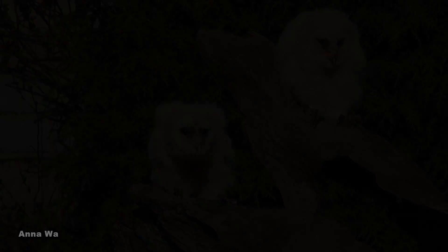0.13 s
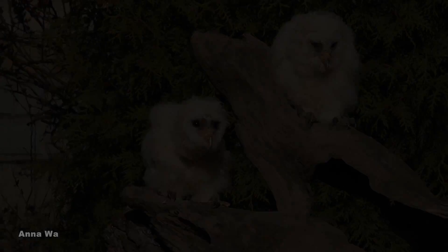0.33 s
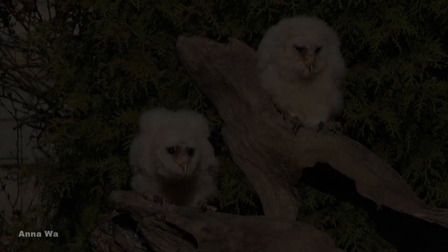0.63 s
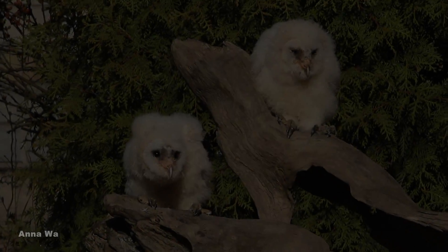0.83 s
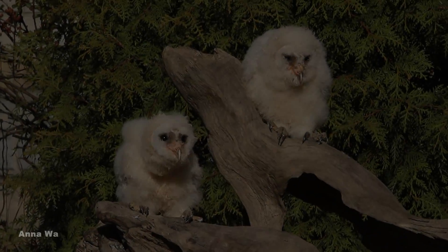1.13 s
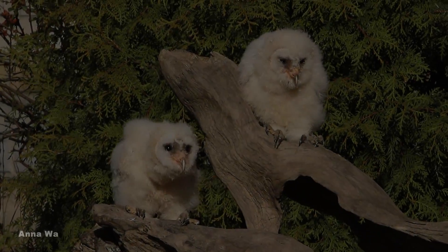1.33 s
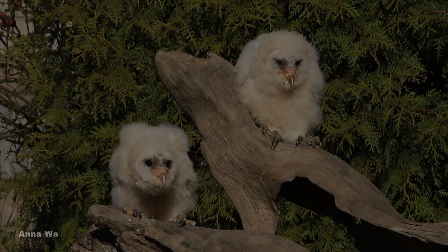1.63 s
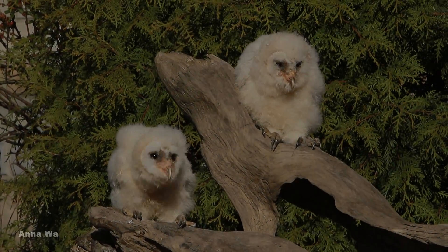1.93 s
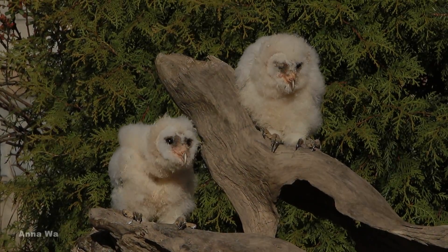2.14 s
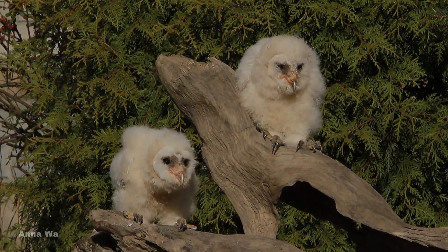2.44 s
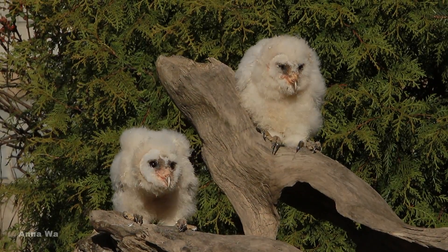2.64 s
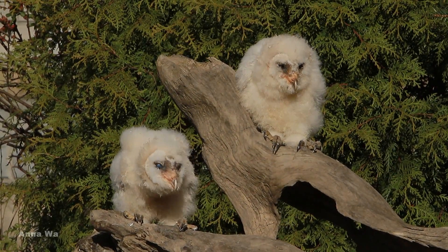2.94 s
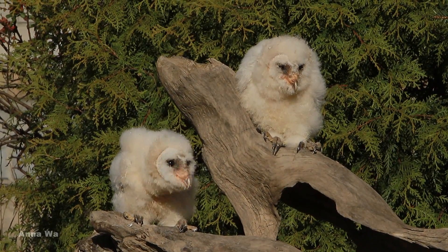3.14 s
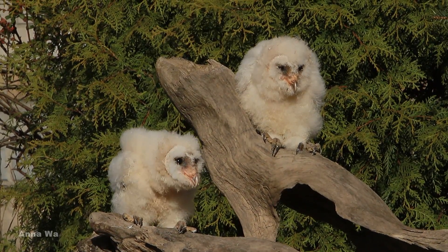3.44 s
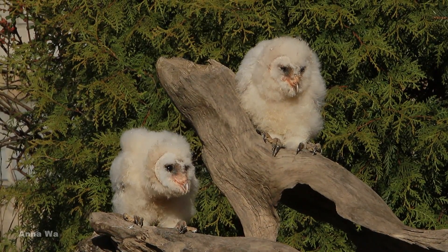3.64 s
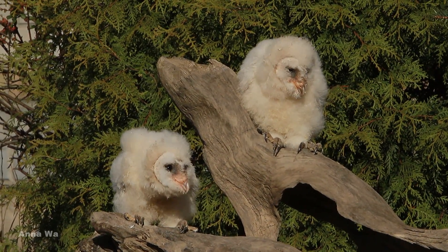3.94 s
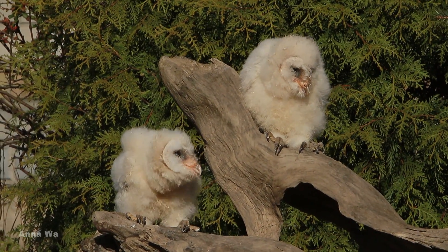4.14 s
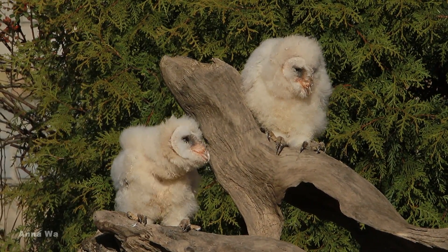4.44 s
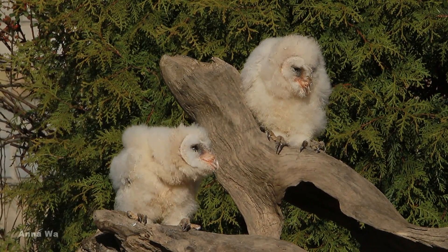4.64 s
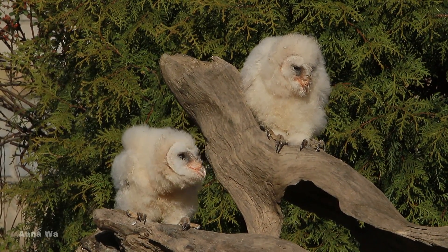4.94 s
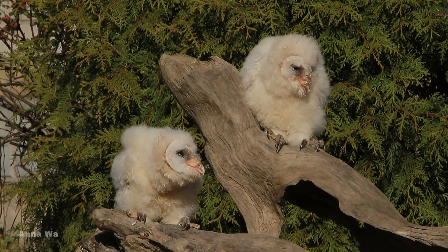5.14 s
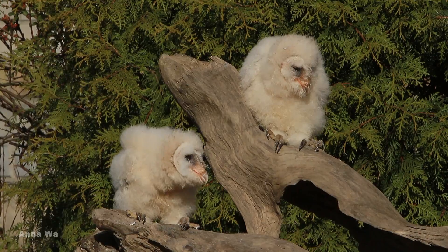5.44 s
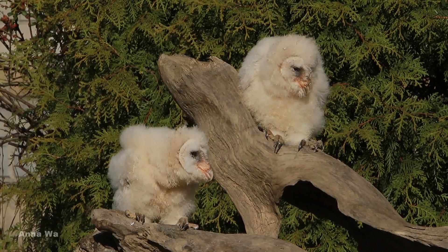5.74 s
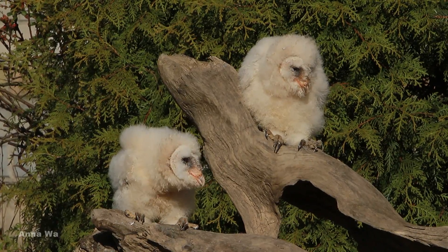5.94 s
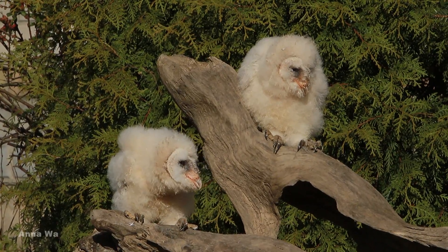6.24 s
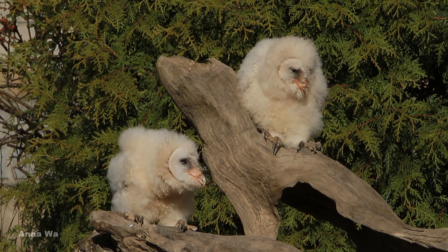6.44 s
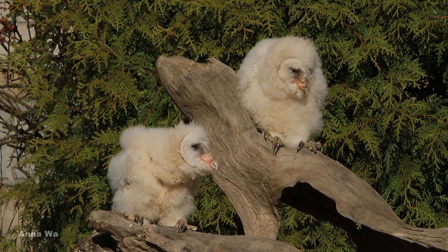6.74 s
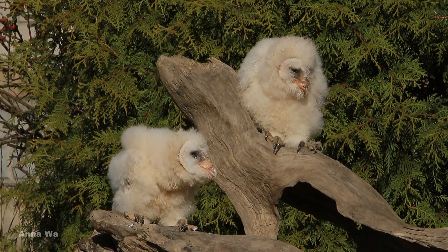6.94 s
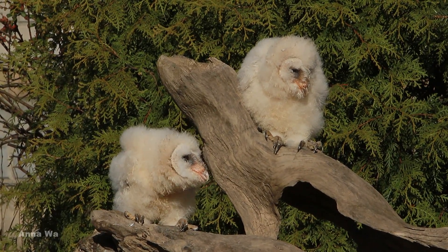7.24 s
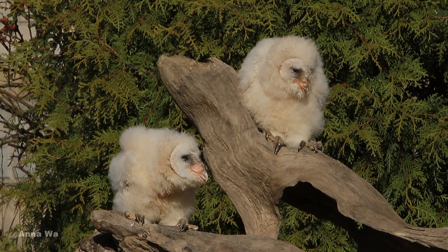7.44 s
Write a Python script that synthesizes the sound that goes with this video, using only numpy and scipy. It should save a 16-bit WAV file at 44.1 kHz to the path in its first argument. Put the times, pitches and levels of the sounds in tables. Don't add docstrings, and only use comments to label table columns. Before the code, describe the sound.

A downy owl chick on a log calls four times in a garden. Each screech is a raspy, shrill trill of rapid arched whistles with creaking between them. The first is already under way and fairly quiet, the second a little stronger, the third and fourth loud and piercing. Tiny squeaks mark starts and ends, a breathy hiss opens the third, and claws tap wood early on. Close mono microphone, slight outdoor echo, low far traffic.

```python
import sys
import numpy as np
from scipy import signal
from scipy.fft import rfft, irfft, next_fast_len
from scipy.io import wavfile
from scipy.ndimage import uniform_filter1d

SR = 44100
rng = np.random.default_rng(int(sys.argv[2]) if len(sys.argv) > 2 else 0)


def wrap_up_sound(samples):
    columns = np.atleast_2d(samples).T
    tamed = np.clip(columns, -1, 1)
    steps = np.round(tamed * 32767).astype(np.int16)
    wavfile.write(sys.argv[1], SR, steps)


def gain_from_decibels(decibels):
    exponent = np.asarray(decibels, float) / 20
    return 10 ** exponent


N = 334719
T = np.arange(N) / SR
HZ = np.arange(next_fast_len(N) // 2 + 1) * SR / next_fast_len(N)


def rms_one(x):
    return x / np.sqrt(np.mean(x ** 2) + 1e-20)


def through(x, response):
    size = next_fast_len(N)
    return irfft(rfft(x, size) * response, size)[:N]


def coloured(points):
    hz, level_db = np.transpose(points)
    curve_db = np.interp(np.log(HZ + 1), np.log(hz), level_db)
    return rms_one(through(rng.standard_normal(N), gain_from_decibels(curve_db)))


def drift(rate_hz):
    return rms_one(through(rng.standard_normal(N), 1 / (1 + (HZ / rate_hz) ** 2)))


# (time [s], level [dB])
GARDEN_LEVEL = [(0.0, -62.5), (1.2, -68.5), (3.32, -66.5), (4.25, -60.5), (4.97, -62.5), (5.81, -61.5),
                (6.42, -64.5), (7.59, -57.5)]
# (frequency [Hz], level [dB per Hz])
GARDEN_SPECTRUM = [(15, -57.5), (25, -7), (91, -3), (240, -3), (317, -1), (500, -7), (1400, -12),
                   (2160, -14.5), (15900, -36)]


def garden():
    s, db = np.transpose(GARDEN_LEVEL)
    gusts_db = 0.7 * drift(3)
    return gain_from_decibels(np.interp(T, s, db) + 2.0 + gusts_db) * coloured(GARDEN_SPECTRUM)


def resonance(hz, centre_hz, width_hz):
    return 1j * hz * width_hz / (centre_hz ** 2 - hz ** 2 + 1j * hz * width_hz)


# (frequency [Hz], width [Hz], level [dB])
POSTURES = [
    [(2525, 570, -5), (5500, 2350, -1.5), (7240, 970, 3.5), (8710, 590, 2.5), (10650, 1400, 1),
     (15700, 2300, -31)],
    [(2600, 1600, -2.5), (4640, 710, 9.5), (7030, 590, 9.5), (8800, 1100, 5), (11700, 820, 5),
     (15100, 2500, -45)],
    [(2600, 1600, 0), (4700, 2800, 1.5), (5880, 1820, 7), (7070, 3800, 1.5), (11170, 1500, -1.5),
     (15100, 2300, -27)],
    [(3150, 1100, -8.5), (5270, 680, -1), (7240, 630, -1), (8300, 500, -9), (9700, 1100, -1.5),
     (15400, 2500, -13)],
    [(3000, 4000, -10), (4700, 1500, -2), (7400, 970, -5.5), (8200, 370, 1), (9600, 2600, -5.5),
     (15500, 1700, -23)],
    [(2880, 2350, -5), (4700, 1300, -0.5), (6700, 1570, 1), (9160, 970, 1.5), (10980, 910, -0.5),
     (15000, 2500, -49)],
    [(2560, 2700, -1.5), (4800, 1740, 4.5), (6870, 1560, 4), (8740, 1100, 6), (10840, 1870, 0.5),
     (15000, 2800, -13)],
]
POSTURE_CHANGES = [2.3, 2.82, 3.8, 4.04, 4.27, 6.0]
WINDPIPE_CUT_HZ = 1550


def throat(hz, posture):
    peaks = 0
    for k, (centre_hz, width_hz, db) in enumerate(POSTURES[posture]):
        peaks = peaks + (-1) ** k * gain_from_decibels(db) * resonance(hz, centre_hz, width_hz)
    return peaks / (1 + (WINDPIPE_CUT_HZ / (hz + 1)) ** 6)


# (time [s], air flow [dB], slackness as buzz over flow [dB])
BREATH_FLOWS = [
    [(0.0, -54, -16.5), (0.462, -56, -15.5), (0.62, -55.5, -15), (0.75, -68, -35)],
    [(0.765, -56.5, -16), (0.865, -59.5, -10), (0.955, -60, -27)],
    [(0.968, -60, -18), (1.394, -57.5, -23), (1.766, -51, -25), (1.818, -52, -46), (1.93, -52, -19),
     (1.945, -55, -10)],
    [(2.525, -58, 1), (2.55, -80, 13)],
    [(2.596, -60, -26), (2.607, -57, -21.5)],
    [(2.636, -66, -14), (2.642, -58, -10)],
    [(2.645, -47, -17), (2.668, -55, -25)],
    [(2.671, -47, -12), (2.835, -55, -4.5), (3.103, -48, -14.5), (3.391, -53, -9), (3.46, -46.5, -13.5),
     (3.51, -43.5, 3), (3.53, -46, 6), (3.552, -56.5, -30), (3.72, -73, -30)],
    [(3.87, -58.5, -26), (4.064, -37, -47), (4.194, -44.5, -8.5), (4.592, -38.5, -21),
     (5.444, -38.5, -19.5), (5.585, -39, -18), (5.6, -41, -14), (5.62, -32.5, -23), (5.655, -39, -15.5),
     (5.672, -43, -5.5)],
    [(6.168, -47, -3.5), (6.352, -38.5, -16), (6.574, -38.5, -16), (6.88, -39.5, -13), (7.12, -41.5, -15),
     (7.268, -59, -29), (7.425, -44, -24), (7.445, -46, -30)],
]


def breath_controls():
    rasp, buzz = np.zeros(N), np.zeros(N)
    for rows in BREATH_FLOWS:
        s, flow_db, slack_db = np.transpose(rows)
        on = (T >= s[0]) & (T < s[-1])
        rasp[on] = gain_from_decibels(np.interp(T[on], s, flow_db))
        buzz[on] = gain_from_decibels(np.interp(T[on], s, flow_db + slack_db))
    return uniform_filter1d(rasp, size=44), uniform_filter1d(buzz, size=44)


# (time [s], share of their final pitch [0-1])
BEAK_OPENING = [(2.64, 0.86), (2.79, 1.0)]


def gaping(x):
    share = np.interp(T, *np.transpose(BEAK_OPENING))
    lag = np.cumsum(1 - share)
    slowed = np.interp(np.arange(N) - lag, np.arange(N), x)
    return np.where((share < 1) & (T > 2.3), slowed, x)


SURGE_DB = 10.5
REBOUND_DB, REBOUND_MS = 3, 4


def creak(rasp, buzz, voiced, hoarse, pulse_hz=950, jitter=0.17, size_db=2.8):
    cycles = np.cumsum(pulse_hz * np.exp(jitter * drift(500) + 0.05 * drift(25))) / SR
    slap_sizes = gain_from_decibels(size_db * np.clip(rng.standard_normal(N), -2, 1.5))
    slaps = np.diff(np.floor(cycles), prepend=0) * slap_sizes
    slaps = rms_one(slaps - slaps.mean())
    air = rng.standard_normal(N)
    leak = 0.15 + 1.6 * hoarse ** 2
    source = (1 - hoarse) * slaps * (1 - voiced) + leak * air * (1 - (1 - hoarse ** 2.7) * voiced)
    posture = np.searchsorted(POSTURE_CHANGES, T)
    high = np.zeros(N)
    for k in range(len(POSTURES)):
        response = throat(HZ, k)
        held = uniform_filter1d(1.0 * (posture == k), size=3000)
        high += held * rms_one(through(source, response * abs(response) ** 0.16))
    windpipe = resonance(HZ, 840, 1330) * (resonance(HZ, 740, 940) - 0.5 * resonance(HZ, 1420, 190))
    low = rms_one(through(slaps * (1 - 0.82 * voiced) + 0.53 * air * (1 - voiced), windpipe))
    ending = np.maximum(-np.diff(voiced, prepend=0), 0)
    rebound = signal.lfilter([1], [1, -np.exp(-1000 / (REBOUND_MS * SR))], ending)
    surge_db = SURGE_DB * uniform_filter1d(voiced, size=600) + REBOUND_DB * rebound - 3.5
    clumps = gain_from_decibels(1.4 * drift(60))
    return (gain_from_decibels(surge_db) * rasp * gaping(high) + gain_from_decibels(0.5) * buzz * low) * clumps


FLICKER_DB = 2.0


def whistle(start_s, pitch, shape, slope_db, wobble):
    phase = 2 * np.pi * np.cumsum(pitch * (1 + wobble)) / SR
    order = np.arange(1, 8)[:, None]
    colour = throat(order * pitch, np.searchsorted(POSTURE_CHANGES, start_s))
    parts = colour * abs(colour) ** 0.65 * gain_from_decibels(slope_db * order) * (order * pitch < 15800)
    chance = rng.standard_normal((7, len(pitch) + 300))
    flicker = uniform_filter1d(chance, size=200)[:, 150:-150] * np.sqrt(200)
    parts = parts * gain_from_decibels(FLICKER_DB * np.minimum(order, 3) * flicker / 2)
    scale = np.sqrt(np.sum(abs(parts) ** 2, axis=0) / 2)
    evened = scale ** 0.37 * scale[np.argmax(shape)] ** 0.71
    return shape * np.real(parts * np.exp(1j * order * phase)).sum(axis=0) / evened


# (time [s], rise [ms], fall [ms], slope [dB per overtone])
MEMBRANE_SETTING = [(0.05, 11.5, 10.7, -3.5), (0.5, 10.7, 10.6, -4), (1.2, 10.2, 11.2, -5.5),
                    (1.66, 12.5, 11.7, -1), (2.85, 10.6, 8.7, -0.5), (3.2, 9.8, 14.5, -2.5),
                    (3.38, 16, 12.6, 1), (3.49, 18, 13, -6), (4.35, 11.4, 9.1, 0.5), (4.549, 10.7, 9.2, 1),
                    (4.8, 8.4, 7.1, 0.5), (5.099, 8.6, 10.5, 1), (5.5, 8, 7.6, 1), (6.25, 9.7, 9.3, -4.5),
                    (6.4, 11.6, 10.8, -1), (6.6, 15.5, 11.3, -0.5), (6.848, 11.7, 7.2, 1.5),
                    (7.001, 12.8, 14.5, 0.4)]


def membrane(when):
    times, *columns = np.transpose(MEMBRANE_SETTING)
    return [np.interp(when, times, column) for column in columns]


# (time of the top [s], level [dB], top pitch [Hz], start pitch [Hz], end pitch [Hz])
OPENING_THROBS = [(0.001, -44.5, 2930, 2700, 2350), (0.055, -43, 2960, 2560, 2400),
                  (0.103, -42, 3000, 2610, 2450), (0.154, -46, 2930, 2310, 2280),
                  (0.207, -45.5, 3140, 2290, 2370), (0.259, -47.5, 3000, 2340, 2220),
                  (0.311, -47, 2880, 2530, 2130), (0.36, -51.5, 2620, 2520, 2500),
                  (0.419, -52.5, 2600, 2470, 2470), (0.463, -50, 2860, 2480, 2060),
                  (0.51, -45, 3060, 2695, 2240), (0.567, -47.5, 2680, 2615, 2260),
                  (0.617, -49, 2695, 2300, 2280), (0.814, -52, 2740, 2500, 2330),
                  (0.864, -54, 2770, 2460, 2200), (0.913, -56.5, 2560, 2500, 2400)]
FIRST_CALL_THROBS = [(1.015, -54, 2455, 2380, 2320), (1.066, -53, 2760, 2360, 2360),
                     (1.119, -53.5, 2620, 2350, 2170), (1.17, -48.5, 3030, 2480, 1970),
                     (1.221, -48, 2960, 2540, 2070), (1.275, -48, 2960, 2300, 2060),
                     (1.328, -51.5, 2620, 2240, 2180), (1.379, -51, 2700, 2600, 2180),
                     (1.431, -48.5, 2860, 2600, 2160), (1.479, -46.5, 2910, 2520, 2200),
                     (1.529, -47.5, 2920, 2440, 2200), (1.577, -48, 2850, 2410, 2440),
                     (1.626, -48.5, 2930, 2560, 2740), (1.677, -47.5, 3030, 2430, 2520)]
SECOND_CALL_THROBS = [(2.835, -47.5, 2490, 2260, 2320), (2.877, -45, 2700, 2250, 2440),
                      (2.923, -38.5, 2880, 2290, 2100), (2.974, -41, 2786, 2450, 2230),
                      (3.023, -41, 2780, 2450, 2210), (3.074, -39.5, 2860, 2410, 2310),
                      (3.122, -41, 2820, 2240, 2370), (3.171, -40, 2936, 2465, 2430),
                      (3.22, -40.5, 2810, 2600, 2390), (3.272, -41, 2936, 2530, 2460),
                      (3.324, -39, 2990, 2350, 2110), (3.379, -36.5, 3080, 2370, 2270),
                      (3.491, -41, 2650, 2310, 2310)]
THIRD_CALL_THROBS = [(4.234, -43, 3200, 2510, 3000), (4.283, -32.5, 3510, 2200, 3100),
                     (4.331, -34, 3536, 2220, 3120), (4.378, -34, 3740, 2260, 3150),
                     (4.424, -31, 3610, 2510, 3000), (4.473, -30, 3960, 2330, 3150),
                     (4.519, -29.5, 3290, 2250, 3080), (4.567, -27.5, 3440, 2240, 3100),
                     (4.615, -31, 3330, 2160, 3100), (4.664, -32, 3260, 2170, 2680),
                     (4.712, -31, 3420, 1916, 3020), (4.76, -31.5, 3040, 2070, 2380),
                     (4.809, -32.5, 3260, 2165, 2880), (4.859, -32, 3170, 2220, 2440),
                     (4.907, -33.5, 2706, 1934, 2150), (4.955, -32, 2504, 2210, 2100),
                     (5.005, -35.5, 2560, 1985, 2080), (5.054, -33.5, 2640, 2150, 2030),
                     (5.104, -34, 2600, 2020, 1890), (5.155, -33, 2560, 2090, 2030),
                     (5.208, -31, 2750, 2070, 2250), (5.257, -31.5, 2390, 2155, 2250),
                     (5.306, -32.5, 2333, 2080, 2100), (5.358, -34, 2560, 2270, 1950),
                     (5.406, -33, 2430, 2230, 1870), (5.462, -32.5, 2760, 1710, 2700),
                     (5.512, -30.5, 2474, 2104, 2300), (5.561, -32, 2366, 2210, 2130)]
FOURTH_CALL_THROBS = [(6.362, -33.5, 2770, 2100, 2240), (6.41, -32, 3110, 2110, 2250),
                      (6.459, -30, 2880, 2126, 2250), (6.509, -28.5, 2940, 2250, 2420),
                      (6.555, -33.5, 2690, 2300, 2420), (6.604, -30, 2810, 2390, 2400),
                      (6.652, -29, 2920, 2214, 2130), (6.703, -27.5, 3000, 2195, 2204),
                      (6.753, -30.5, 2740, 2200, 1904), (6.804, -29.5, 2560, 2150, 2200),
                      (6.853, -30.5, 3080, 2225, 1820), (6.903, -28, 2460, 2170, 2340),
                      (6.952, -31.5, 2580, 2310, 2390), (6.997, -35, 2600, 2270, 2300),
                      (7.049, -37.5, 2520, 2360, 2280), (7.096, -38, 2560, 2490, 2320)]
STRETCH_MS_PER_KHZ, FALL_STRETCH_MS_PER_KHZ, USUAL_ARCH_HZ = 4.0, 4.2, 600.8
LEVELS_OFF_MS = 25.9
FOOT_DULLING_DB = 9
CRACK_FROM_HZ, CRACK_DB_PER_KHZ, CRACK_MS = 3350, -21, 1.3


def throbs(hoarse, wobble, shimmer, rise_edge_ms=4.7, fall_edge_ms=2.2, rise_foot_db=-6.0, fall_foot_db=-1.0):
    out, voiced = np.zeros(N), np.zeros(N)
    slope = membrane(T)[2]
    calls = OPENING_THROBS + FIRST_CALL_THROBS + SECOND_CALL_THROBS + THIRD_CALL_THROBS + FOURTH_CALL_THROBS
    for s, db, top_hz, start_hz, end_hz in calls:
        rise, fall, _ = membrane(s)
        rise = max(3.0, rise + STRETCH_MS_PER_KHZ * (top_hz - start_hz - USUAL_ARCH_HZ) / 1000)
        fall = max(3.0, fall + FALL_STRETCH_MS_PER_KHZ * (top_hz - end_hz - USUAL_ARCH_HZ) / 1000)
        first = max(0, round((s - (rise + 3) / 1000) * SR))
        at = np.arange(first, round((s + (fall + 2) / 1000) * SR))
        ms = (T[at] - s) * 1000
        rising = ms < 0
        reach = np.where(rising, rise, fall)
        crown = 1.15 + 0.12 * min(rise, fall)
        down = (np.hypot(ms, crown) - crown) / (np.hypot(reach, crown) - crown)
        bent = down + reach / LEVELS_OFF_MS * down * (1 - down)
        pitch = np.maximum(top_hz - np.where(rising, top_hz - start_hz, top_hz - end_hz) * bent, 900)
        gate = np.clip(np.minimum((ms + rise + 3) / rise_edge_ms, (fall + 2 - ms) / fall_edge_ms), 0, 1)
        crack_db = CRACK_DB_PER_KHZ * max(0, top_hz - CRACK_FROM_HZ) / 1000 * np.exp(-(ms / CRACK_MS) ** 2)
        shape = gate * gain_from_decibels(np.where(rising, rise_foot_db, fall_foot_db) * down + crack_db)
        dulled = slope[at] - 2.4 * hoarse[at] - FOOT_DULLING_DB * hoarse[at] ** 2 * down
        out[at] += gain_from_decibels(db) * shimmer[at] * whistle(s, pitch, shape, dulled, wobble[at])
        voiced[at] = np.maximum(voiced[at], gate)
    return out, voiced


# (time [s], peak level [dB], ring [Hz])
CLAW_TAPS = [(0.065, -43, 940), (0.077, -38.5, 1030), (0.0765, -32, 2600), (0.081, -49, 1230),
             (0.085, -44, 920), (0.22, -40.5, 1430), (0.222, -38, 1900), (0.225, -38, 2340),
             (0.248, -45, 1750), (0.2485, -41, 1280), (0.249, -45, 2300), (2.646, -41.5, 780)]
# (time [s], peak level [dB], ring [Hz])
LOG_BUMPS = [
    (0.085, -41, 205),
    (5.645, -42, 126),
    (5.65, -43, 290),
    (5.695, -44, 280),
    (5.745, -47, 320),
    (7.44, -69, 123),
]


def knocks(events, width_share, crack=0.0):
    out = np.zeros(N)
    after = np.arange(round(0.08 * SR)) / SR
    for s, db, hz in events:
        ring = np.sin(2 * np.pi * hz * after + crack) * np.exp(-np.pi * width_share * hz * after)
        out[round(s * SR):][:len(after)] += gain_from_decibels(db) * ring
    return out


# (start time [s], length [ms], level [dB], start pitch [Hz], end pitch [Hz])
SHORT_SQUEAKS = [(0.767, 6, -55, 3880, 2260), (1.085, 17, -64, 3340, 3150), (2.502, 12, -53, 3670, 3960),
                 (2.511, 15, -49, 4020, 3720), (2.526, 5.8, -49, 4700, 4800), (2.534, 11, -56, 5500, 6700),
                 (2.594, 11, -49, 3920, 4220), (3.441, 10, -41, 3390, 2310), (3.87, 9, -53, 5440, 5900),
                 (0.769, 9.9, -62, 4200, 3000), (0.971, 7, -61.5, 3740, 3000), (0.974, 6, -69, 5500, 5900),
                 (3.873, 10, -57, 3200, 3360), (4.263, 11, -46, 3820, 4940), (4.177, 23, -46, 2100, 2420)]
JOINING_SLIDES = [
    (6.198, 9.3, -39, 2280, 2200),
    (6.247, 15.3, -42, 1900, 2400),
    (6.294, 19.6, -42.5, 1900, 2260),
    (6.2, 22, -43, 1040, 1090),
]
GLIDE_SAG = 0.335


def glides(wobble, shimmer, squeak_slope_db=-10.5):
    out, voiced = np.zeros(N), np.zeros(N)
    slope = membrane(T)[2]
    for events, is_squeak in ((SHORT_SQUEAKS, True), (JOINING_SLIDES, False)):
        for s, length, db, start_hz, end_hz in events:
            middle_hz = min(start_hz, end_hz) + GLIDE_SAG * abs(start_hz - end_hz)
            at = np.arange(round(s * SR), round((s + length / 1000) * SR))
            part = np.linspace(0, 1, len(at))
            pitch = np.polyval(np.polyfit([0, 0.5, 1], [start_hz, middle_hz, end_hz], 2), part)
            gate = np.clip(np.minimum(part / 0.5, (1 - part) / 1.0) * length, 0, 1)
            purer = squeak_slope_db if is_squeak else slope[at]
            out[at] += gain_from_decibels(db) * shimmer[at] ** 0.5 * whistle(s, pitch, gate, purer, wobble[at] / 2)
            voiced[at] = np.maximum(voiced[at], gate * (start_hz > WINDPIPE_CUT_HZ))
    return out, voiced


# (slope [dB per overtone], turning points (time [s], pitch [Hz], level [dB]))
UNBROKEN_PHRASES = [
    (-1, [(1.715, 2460, -54), (1.727, 3000, -43.5), (1.74, 2180, -53), (1.752, 2650, -58)]),
    (-1, [(1.768, 2880, -46), (1.774, 2956, -38), (1.782, 2966, -38.5), (1.793, 1660, -49), (1.82, 2560, -53), (1.829, 2920, -39), (1.842, 2325, -49), (1.856, 1820, -49), (1.878, 2430, -49), (1.893, 2120, -57)]),
    (-26, [(1.936, 4800, -62), (1.942, 3470, -47.5), (1.951, 2920, -52.5)]),
    (-3, [(3.408, 2235, -46), (3.422, 2646, -41), (3.431, 3620, -35.5)]),
    (-17, [(3.502, 2460, -57), (3.529, 3310, -42), (3.533, 3850, -44), (3.54, 3230, -39.5), (3.546, 3150, -45)]),
    (-14.5, [(5.667, 3080, -39), (5.673, 3410, -35.5), (5.678, 3606, -39.5), (5.684, 3180, -37.5), (5.692, 3000, -52)]),
    (-15.5, [(6.155, 3130, -39), (6.166, 3890, -41), (6.171, 5960, -39)]),
    (-2, [(7.137, 2280, -49), (7.15, 2703, -38.5), (7.172, 2176, -46), (7.193, 2754, -37.5), (7.222, 2250, -45), (7.243, 2666, -37), (7.265, 2070, -45.5), (7.291, 2527, -36.5), (7.31, 2030, -46), (7.337, 2293, -40), (7.358, 1967, -48.5), (7.388, 2325, -40), (7.405, 2000, -45.5), (7.439, 2174, -47)]),
    (-11, [(7.438, 2960, -41), (7.447, 3755, -43.5), (7.455, 3140, -37.5), (7.46, 2850, -44)]),
]
ROUNDING = 0.29


def phrases(wobble, shimmer):
    out, voiced = np.zeros(N), np.zeros(N)
    for slope_db, rows in UNBROKEN_PHRASES:
        s, hz, db = np.transpose(rows)
        at = np.arange(round(s[0] * SR), round(s[-1] * SR))
        turns = np.arange(len(s))
        step = np.interp(T[at], s, turns)
        step = step - ROUNDING * np.sin(2 * np.pi * step) / (2 * np.pi)
        pitch = np.interp(step, turns, hz)
        gate = np.clip(np.minimum(T[at] - s[0], s[-1] - T[at]) * 700, 0, 1)
        shape = gate * gain_from_decibels(np.interp(T[at], s, db))
        out[at] += shimmer[at] ** 0.5 * whistle(s[0], pitch, shape, slope_db, wobble[at])
        voiced[at] = np.maximum(voiced[at], gate)
    return out, voiced


def clean_voice(hoarse):
    wobble = 0.042 * hoarse ** 2 * drift(450)
    shimmer = gain_from_decibels((0.6 + 1.8 * hoarse) * drift(150))
    kinds = [throbs(hoarse, wobble, shimmer), glides(wobble, shimmer), phrases(wobble, shimmer)]
    sounds, voiced = zip(*kinds)
    return np.sum(sounds, axis=0), np.max(voiced, axis=0)


# (time [s], level [dB])
HISS_LEVEL = [
    (3.872, -62),
    (3.96, -54),
    (4.099, -50.5),
    (4.22, -50),
    (4.45, -66),
]
# (frequency [Hz], level [dB per Hz])
HISS_SPECTRUM = [(180, -30), (300, -9), (634, 2.5), (1190, -0.5), (2200, -2), (8330, -12), (15900, -29)]


def hiss():
    s, db = np.transpose(HISS_LEVEL)
    breath = coloured(HISS_SPECTRUM)
    narrow, wide = (rms_one(through(breath, 0.15 + abs(throat(HZ, k)))) for k in (3, 4))
    opened = np.clip((T - 3.98) / 0.1, 0, 1)
    banded = (1 - opened) * narrow + opened * wide
    flutter_db = 0.7 * drift(74)
    return gain_from_decibels(np.interp(T, s, db + 12.0, left=-150, right=-150) + flutter_db) * banded


def echoes(x, t60=0.43, dull_hz=6000, gap_s=0.0048):
    after = np.arange(SR) / SR
    tail = rng.standard_normal(SR) * gain_from_decibels(-60 * after / t60) * (after > gap_s)
    wash = signal.fftconvolve(x, tail / np.sqrt(np.sum(tail ** 2)))[:N]
    return through(wash, 1 / (1 + 1j * HZ / dull_hz))


# (time [s], hoarseness [0-1])
HOARSE_VOICE = [(0, .7), (1.65, .6), (1.8, .55), (2.5, .3), (2.65, .7), (3.5, .6), (4.2, .8), (4.5, .58),
                (4.8, .42), (6.17, .4), (6.2, .75), (6.4, .3), (7.4, .44)]


def scene():
    rasp, buzz = breath_controls()
    hoarse = np.interp(T, *np.transpose(HOARSE_VOICE))
    voice, voiced = clean_voice(hoarse)
    near = voice + creak(rasp, buzz, voiced, hoarse) + hiss() + knocks(CLAW_TAPS, 0.15, crack=1.0)
    mono = gain_from_decibels(-6.5) * echoes(near) - near + knocks(LOG_BUMPS, 0.26) + garden()
    return np.array([mono, mono])


def roll_off(x):
    return signal.sosfilt(signal.butter(12, 16080, fs=SR, output="sos"), x)


OFFSET = 0.0004


def record(dry):
    band = 1 / (1 + (55 / (HZ + 1)) ** 2) / (1 + (HZ / 15950) ** 300)
    heard = through(dry[0], band) + OFFSET
    return roll_off(np.array([heard, heard]))


dry = scene()
out = record(dry)
wrap_up_sound(out)
```